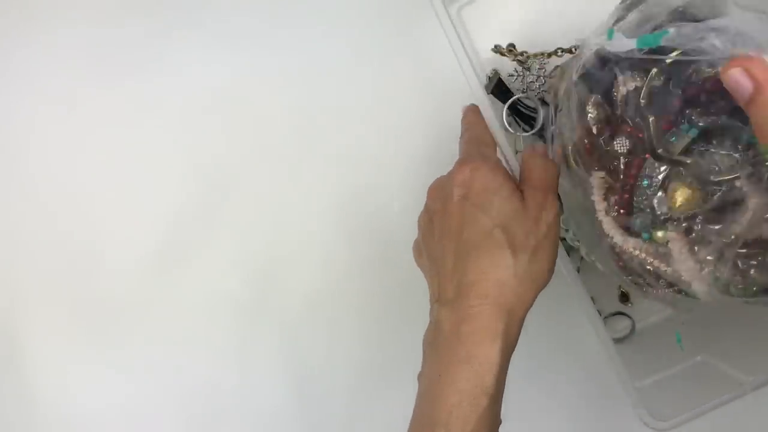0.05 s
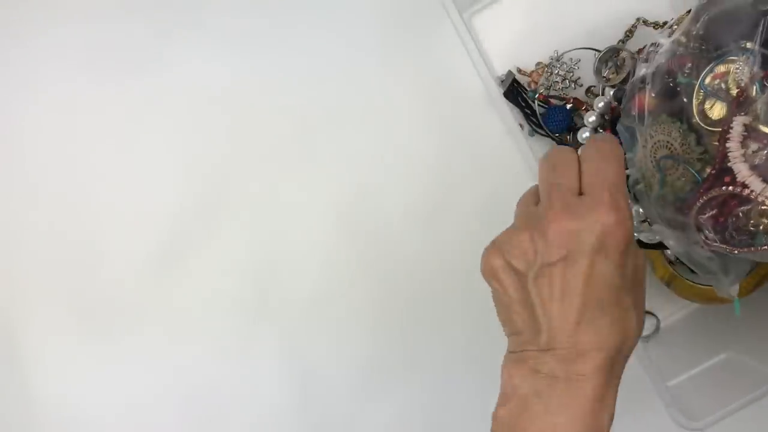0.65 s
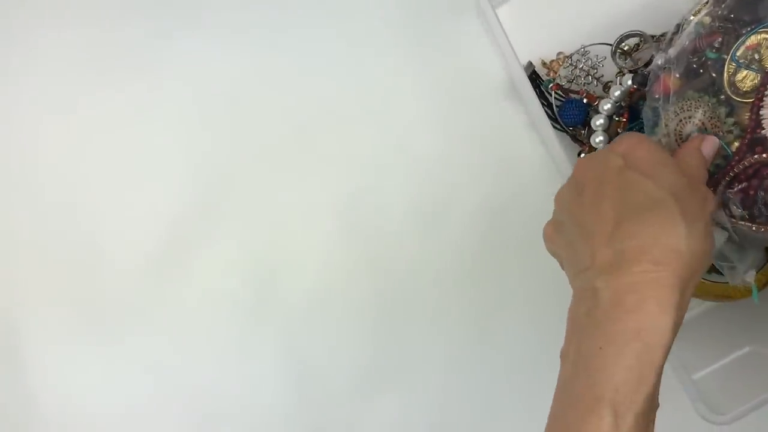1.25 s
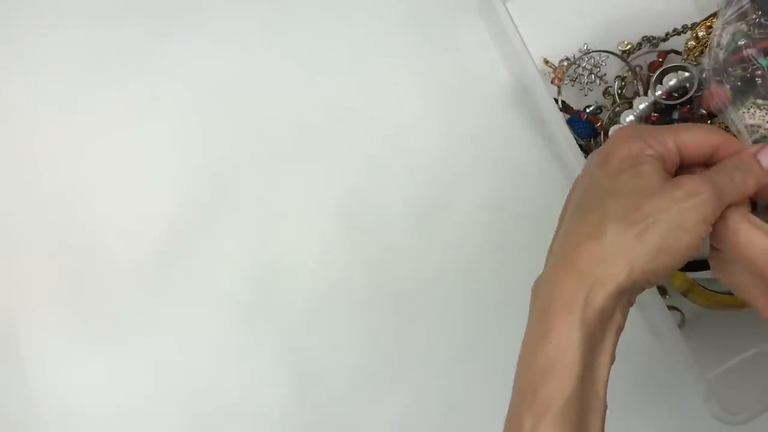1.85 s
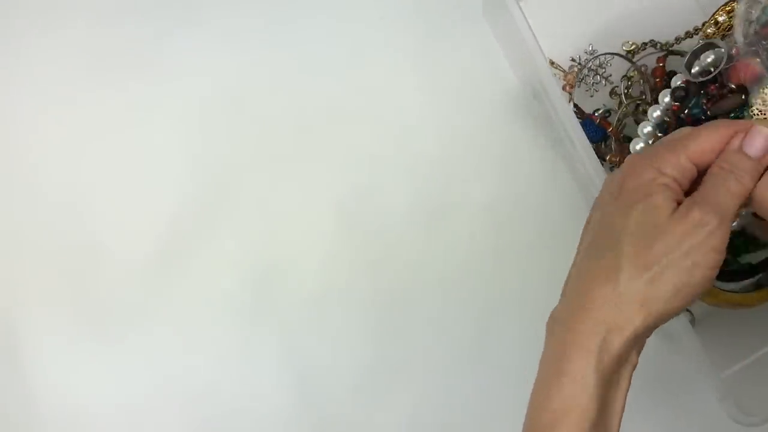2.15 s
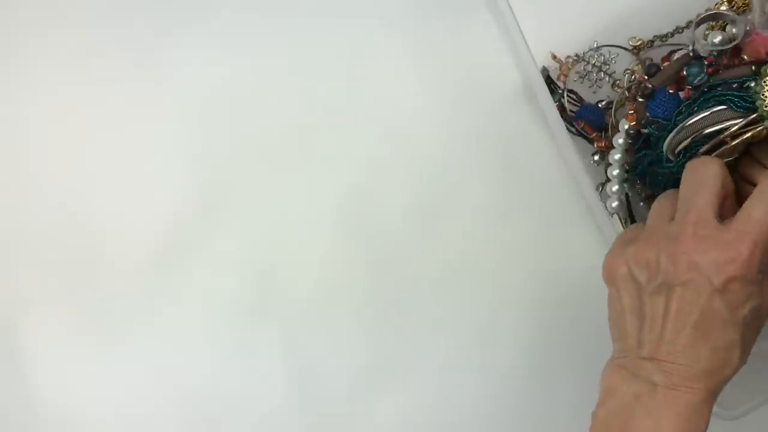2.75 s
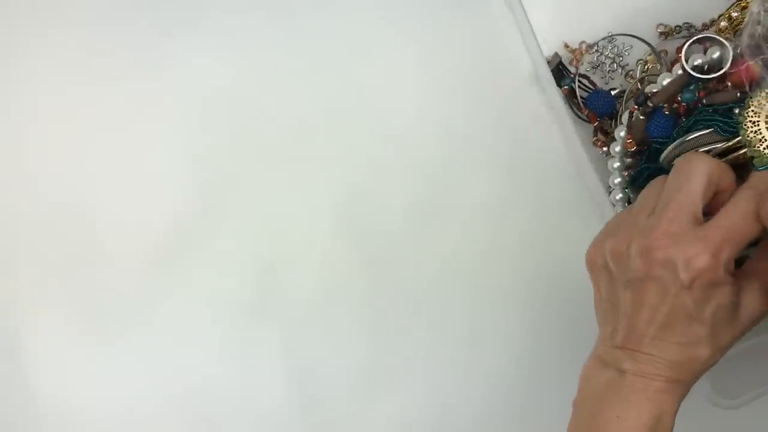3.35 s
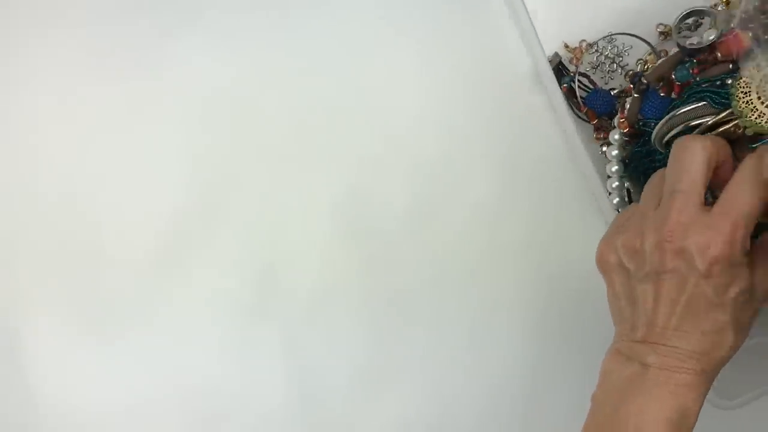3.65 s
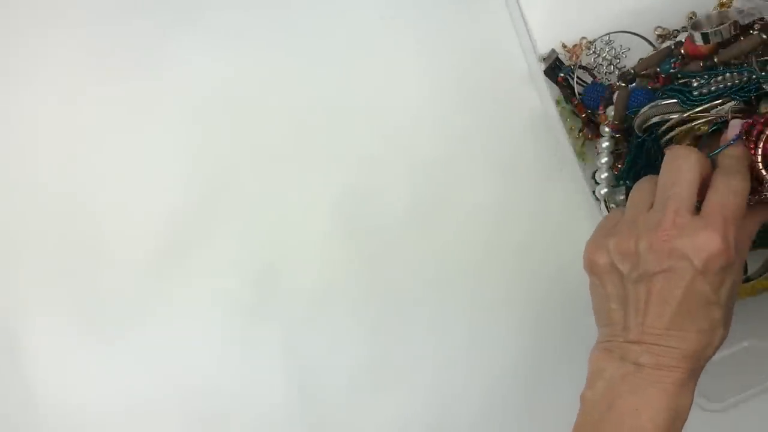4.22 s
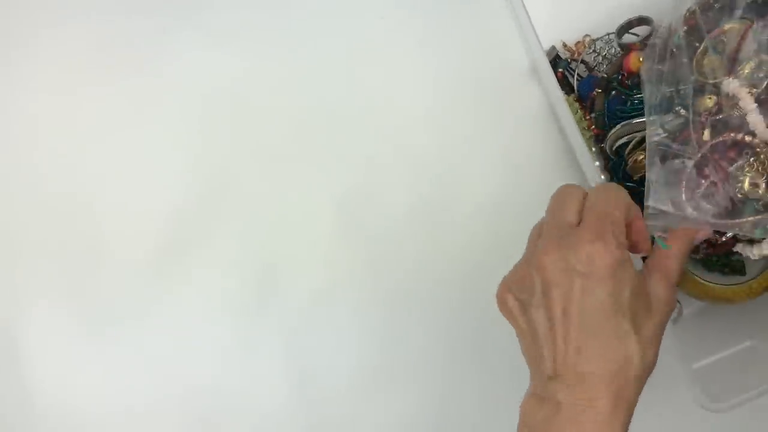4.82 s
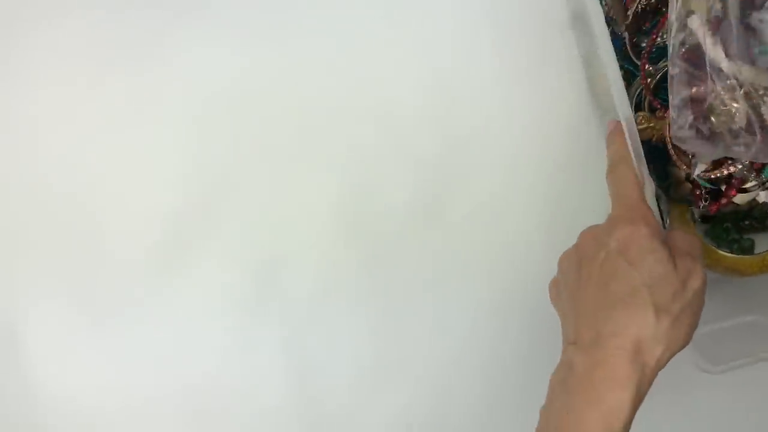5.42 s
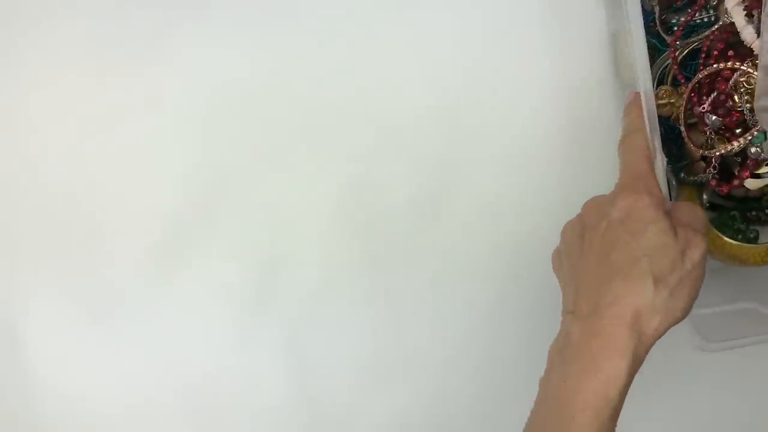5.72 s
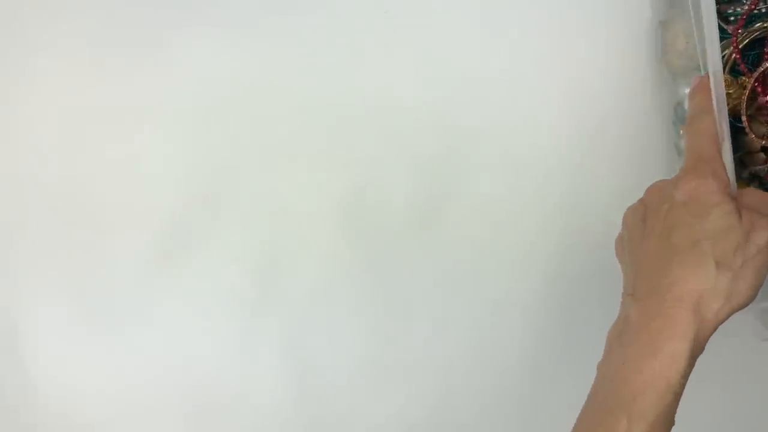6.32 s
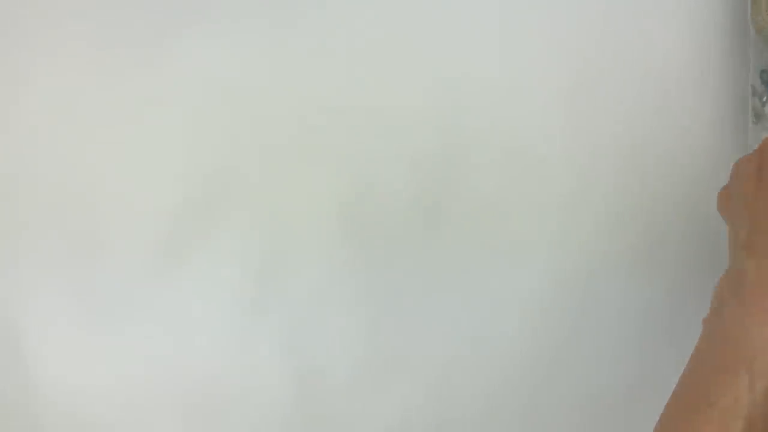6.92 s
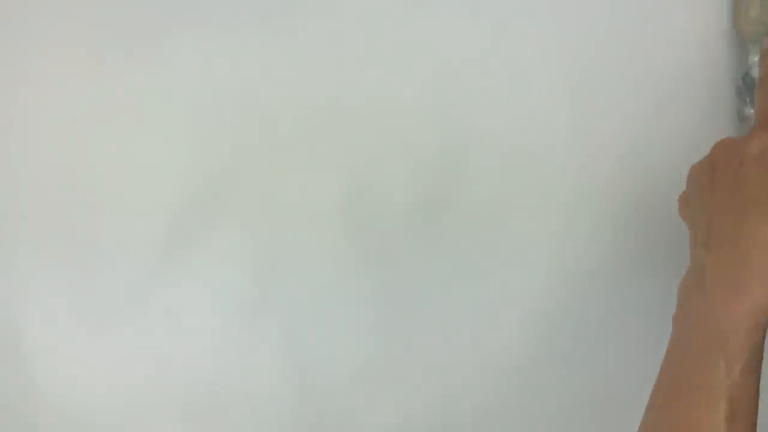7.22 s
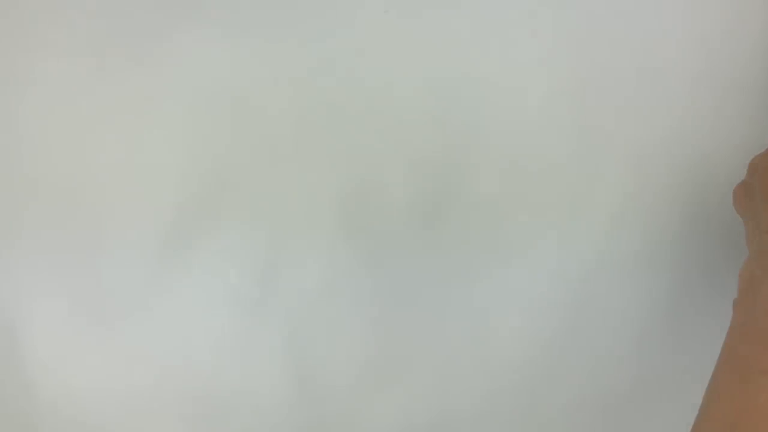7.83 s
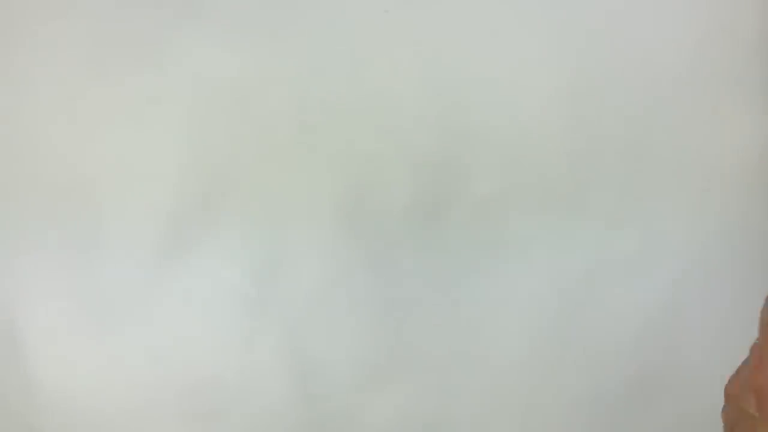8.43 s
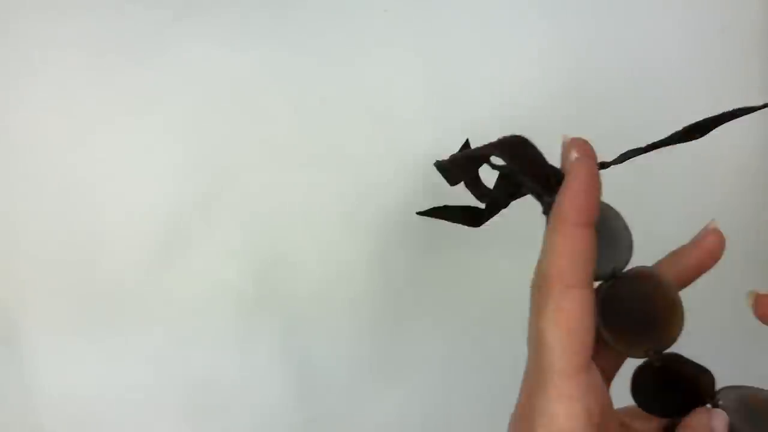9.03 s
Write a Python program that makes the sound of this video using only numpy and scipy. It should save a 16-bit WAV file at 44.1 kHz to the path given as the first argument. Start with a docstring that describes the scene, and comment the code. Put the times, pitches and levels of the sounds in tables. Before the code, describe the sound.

Beads and metal trinkets spill rattling into a plastic box in several bursts, followed by crinkling plastic in a small room.

```python
"""Costume jewellery is shaken from a plastic bag into a plastic box, close by in a small room.
Beads and metal trinkets clack, chatter and slide over the heap: short modes plus contact noise.
The box knocks and the table thumps under them; a pendant rings on after the last big pour.
Then the empty bag is crumpled, its film buckling in tiny steps and its creases snapping."""
import sys
import numpy as np
from scipy import signal
from scipy.fft import rfft, irfft, next_fast_len
from scipy.io import wavfile
from scipy.ndimage import uniform_filter1d

SR = 44100
rng = np.random.default_rng(int(sys.argv[2]) if len(sys.argv) > 2 else 0)


def dump_mix(stems):
    """Bounce the given channels to the path in sys.argv[1] as a 16-bit WAV at rate SR."""
    frames = np.atleast_2d(stems).T  # one column per channel
    limited = np.clip(frames, -1, 1)  # hard clip at full scale
    pcm = np.round(limited * 32767).astype(np.int16)
    wavfile.write(sys.argv[1], SR, pcm)


N = 404573
TIME_S = np.arange(N) / SR
AGE_S = np.arange(int(0.16 * SR)) / SR  # time since a blow
BRIEF_S = AGE_S[:len(AGE_S) // 2]
TOP_HZ = 15900
FITTING_HZ, FITTING_SPREAD_HZ = 8090, 770  # metal fittings, all of similar size
STIR_END_S = 6.45  # the heap starts coming to rest

# Box modes. Each row: frequency in Hz, relative level in dB, t60 in seconds.
BOX_MODES = [(270, -5, 0.032), (329.6, -6.5, 0.061), (410.3, -2, 0.11), (467.3, -3, 0.09), (470, -5, 0.062),
             (594.5, 1, 0.068), (700, 4, 0.019), (726, -0.5, 0.071), (885, 10, 0.017), (917, -0.5, 0.029),
             (926, 0.5, 0.023), (1088, -0.5, 0.053), (1155, -0.5, 0.021), (1320, -4, 0.024)]
# Tabletop modes. Each row: frequency in Hz, relative level in dB, t60 in seconds.
TABLE_MODES = [(38, -1, 0.22), (62, -10, 0.036), (99, -3, 0.12), (133.3, -2, 0.089), (149, 3, 0.098),
               (159.6, 0.5, 0.099), (193, -4, 0.11), (240, -4, 0.12), (259, -6, 0.022), (317, -9.5, 0.1)]


def amp(db):
    """Decibels to gain."""
    return 10 ** (np.asarray(db) / 20)


def power_sum_db(gains):
    """Level of several movements at once."""
    return 10 * np.log10(sum(g ** 2 for g in gains) + 1e-12)


def unit(x, attack_s=0.012):
    """Scale a blow to rms 1 over its attack."""
    return x / np.sqrt(np.mean(x[:int(attack_s * SR)] ** 2) + 1e-18)


def add(track, start_s, x):
    """Mix x into the track."""
    i = int(np.clip(start_s * SR, 0, N - 1))
    track[i:i + len(x)] += x[:N - i]


def colour(spectrum, hz):
    """Gain of a spectrum at hz. Each row: frequency in Hz, level in dB."""
    points_hz, db = np.transpose(spectrum)
    return amp(np.interp(np.log(hz + 1), np.log(points_hz), db))


def noise(spectrum, samples):
    """Coloured noise of rms 1."""
    n = next_fast_len(samples)
    hz = np.arange(n // 2 + 1) * SR / n
    x = irfft(rfft(rng.standard_normal(n)) * colour(spectrum, hz), n)[:samples]
    return x / x.std()


def fade(age_s, t60_s):
    """Free decay; gain 1 before age 0."""
    return np.exp(-np.log(1000) * np.maximum(age_s, 0) / np.maximum(t60_s, 1e-3))


def push(start_s, length_s, attack_s, sag_db, release_t60_s):
    """Gain of one movement: swells up to its start, sags, dies away."""
    age_s = TIME_S - start_s
    rise = np.clip(1 + age_s / attack_s, 0, 1)
    spent = np.clip(age_s / length_s, 0, 1)
    return rise * amp(-sag_db * spent) * fade(age_s - length_s, release_t60_s)


def ring(modes, age_s, spread_db, detune=0):
    """Struck modes: the contact point weights each anew, a shifting load detunes it."""
    hz, db, t60_s = np.transpose(modes)[:, :, None]
    gain = amp(db + spread_db * rng.standard_normal(hz.shape)) * rng.choice([-1, 1], hz.shape)
    hz = hz * (1 + detune * rng.standard_normal(hz.shape))
    return unit((gain * np.sin(2 * np.pi * hz * age_s) * fade(age_s, t60_s)).sum(0))


def crack(spectrum, t60_s, scatter_db=-18, scatter_t60_s=0.15):
    """Noise burst of a contact or snap, with a weaker tail of scatter."""
    envelope = fade(BRIEF_S, t60_s) + amp(scatter_db) * fade(BRIEF_S, scatter_t60_s)
    return unit(noise(spectrum, len(BRIEF_S)) * envelope)


def shower(sounds, db, per_s, spread_db):
    """Random contacts: per_s a second at -40 dB, denser as the motion grows."""
    rate_per_s = per_s * amp(0.35 * (db + 40))
    hits = np.flatnonzero(rng.random(N) < rate_per_s / SR)
    sizes = amp(spread_db * np.minimum(rng.exponential(size=len(hits)), 3))
    sizes /= np.sqrt(uniform_filter1d(sizes ** 2, size=15))
    gains = sizes * amp(db[hits]) * np.sqrt(SR / rate_per_s[hits])  # rms follows db
    sounds = [x / np.linalg.norm(x) for x in sounds]
    out = np.zeros(N)
    for i, gain, pick in zip(hits, gains, rng.integers(len(sounds), size=len(hits))):
        add(out, i / SR, gain * sounds[pick])
    return out


def trinket(spectrum, hz, t60_s, others_db, crack_db, crack_t60_s, count=6):
    """Small piece: a leading mode, weaker ones around it, and the contact crack."""
    others_hz = np.minimum(hz * 2 ** rng.uniform(-0.7, 0.75, count), TOP_HZ)
    levels_db = others_db + 20 * np.log10(colour(spectrum, others_hz))
    others = np.c_[others_hz, levels_db, t60_s * rng.uniform(0.5, 1.4, count)]
    tone = ring(np.vstack([(hz, 0, t60_s), others]), BRIEF_S, spread_db=-1)
    return unit(tone + amp(crack_db) * crack(spectrum, crack_t60_s))


def bead(hz):
    """Glass, wood or resin: a dry clack."""
    # Contact spectrum. Each row: frequency in Hz, level in dB.
    spectrum = [(200, -35), (700, -18.5), (1300, -1), (2000, -3.5), (3000, -4), (4500, -10.5), (6500, -13),
                (12000, -41)]
    return trinket(spectrum, hz, t60_s=0.019, others_db=-8.5, crack_db=1.5, crack_t60_s=0.042)


def metal(hz):
    """Link, ring or clasp damped by the heap: a bright tick."""
    # Contact spectrum. Each row: frequency in Hz, level in dB.
    spectrum = [(1500, -36), (4000, -10.5), (5800, -9.5), (7700, 1), (9500, -3.5), (11500, -11),
                (13500, -22.5), (16000, -30)]
    return trinket(spectrum, hz, t60_s=0.024, others_db=-2, crack_db=7, crack_t60_s=0.014)


def flow_db(stir_db=-61):
    """Motion of beads and of chains: short spills and the big pour over a slight stir."""
    # One slide per shake. Each row: start and length in seconds, bead and chain levels in dB.
    spills = [(0.0, 0.071, -34, -33), (0.089, 0.072, -24, -26.5), (.245, 0.095, -28, -29),
              (0.379, 0.051, -38, -39.5), (0.488, 0.15, -34, -35), (0.647, 0.11, -42, -44),
              (0.797, 0.07, -33, -38), (1.132, 0.084, -52, -48.5), (1.317, 0.062, -46, -46),
              (1.443, .11, -43, -43.5), (1.627, 0.13, -44, -45), (1.919, 0.092, -44, -44),
              (2.082, 0.093, -45, -47), (2.219, 0.075, -28, -27.5), (2.447, 0.1, -30, -34),
              (2.631, 0.28, -49, -50), (2.981, 0.042, -49, -50), (3.038, .18, -40.5, -42),
              (3.499, 0.19, -55, -56.5), (3.755, 0.047, -29, -30.5), (3.93, 0.064, -41, -43.5),
              (4.039, 0.21, -46.5, -44), (4.283, .05, -37.5, -34.5), (4.383, 0.089, -43, -43.5),
              (4.486, 0.038, -39, -36.5), (4.571, 0.21, -50, -48), (5.85, 0.22, -57.5, -50.5),
              (6.309, 0.059, -49.5, -62)]
    # The bag is upended. Each row: time in seconds, flow in dB.
    pour_curve = [(4.85, -60.5), (4.89, -41.5), (5.08, -38), (5.22, -24.5), (5.33, -21), (5.54, -46.5),
                  (5.59, -42.5), (5.8, -57.5)]
    pour = amp(np.interp(TIME_S, *np.transpose(pour_curve), left=-np.inf, right=-np.inf))
    stir = amp(stir_db) * fade(TIME_S - STIR_END_S, t60_s=0.66)
    beads, chains = [pour, stir], [pour, stir]
    for start_s, length_s, bead_db, chain_db in spills:
        slide = push(start_s, length_s, attack_s=0.018, sag_db=5, release_t60_s=0.22)
        beads.append(slide * amp(bead_db))
        chains.append(slide * amp(chain_db))
    return power_sum_db(beads), power_sum_db(chains)


def sliding_heap(count=60):
    """Beads and chains run over each other and drum lightly on box and table."""
    rattle_db, jingle_db = flow_db()
    clacks = [bead(hz) for hz in np.geomspace(1250, 4200, count)]
    out = shower(clacks, rattle_db - 2, per_s=400, spread_db=1.5)
    ticks = [metal(hz) for hz in rng.normal(8200, 1200, count)]
    out += shower(ticks, jingle_db - 2, per_s=340, spread_db=3)
    box_taps = [ring(BOX_MODES, AGE_S, spread_db=5.5, detune=0.052) for _ in range(count)]
    out += shower(box_taps, rattle_db - 7.5, per_s=350, spread_db=4)
    table_taps = [ring(TABLE_MODES, AGE_S, spread_db=-1.5) for _ in range(count)]
    return out + shower(table_taps, rattle_db - 19, per_s=270, spread_db=6.5)


def strays(db=-57, count=30):
    """Single loose beads and links slip and tick."""
    pieces = [bead(hz) for hz in np.geomspace(1300, 5000, count)]
    pieces += [metal(hz) for hz in rng.normal(FITTING_HZ, FITTING_SPREAD_HZ, count)]
    settling = fade(TIME_S - STIR_END_S, t60_s=0.5)
    return shower(pieces, np.full(N, db), per_s=45, spread_db=1.5) * settling


def background(room_db=-49, rumble_db=-40):
    """Faint room noise over a very deep rumble."""
    # Spectra. Each row: frequency in Hz, level in dB.
    room_spectrum = [(20, 0.5), (35, -2.5), (120, -16.5), (400, -23), (800, -28), (1400, -37.5),
                     (4700, -42.5), (7100, -33.5), (15000, -60)]
    rumble_spectrum = [(2, 9), (6, 7), (12, -10), (25, -3), (50, -43), (100, -20), (400, -86),
                       (2000, -120)]
    rumble = amp(rumble_db) * noise(rumble_spectrum, N)
    return amp(room_db) * noise(room_spectrum, N) + rumble


def bumps(width_oct=0.34):
    """Padded blows reach only a few low modes of the box, and the table under it."""
    # Bumps on the box wall. Each row: start in seconds, level in dB, centre pitch in Hz.
    knocks = [(.012, -29, 413), (0.061, -25, 394), (.33, -41, 610), (1.105, -31.5, 510),
              (1.316, -37.5, 539.6), (1.362, -38, 483.4), (1.428, -34.5, 418.8), (1.703, -40.5, 470),
              (1.975, -42.5, 570), (2.146, -31, 570), (2.433, -44, 480.2), (2.82, -42.5, 468),
              (3.018, -35.5, 476), (3.698, -42, 417.5), (3.745, -22, 334.7), (4.587, -34.5, 749.5),
              (4.875, -34, 413.5), (5.35, -32, 606.6), (6.696, -37.5, 744), (7.566, -31.5, 390),
              (7.625, -39, 400), (8.36, -55, 485), (8.68, -48.5, 555), (9.089, -52.5, 335)]
    # Weight settling on the table. Each row: start in seconds, relative level in dB.
    thumps = [(.078, -36), (0.344, -34), (.47, -39), (0.782, -31), (.83, -41), (1.103, -39), (2.929, -48.5),
              (3.745, -36), (4.261, -41), (4.304, -36), (4.491, -37), (4.774, -34.5), (5.249, -33),
              (5.355, -35), (7.569, -30.5), (7.607, -35), (7.669, -38), (8.534, -57)]
    out = np.zeros(N)
    for start_s, db, centre_hz in knocks:
        reached = [(hz, -4 * (np.log2(hz / centre_hz) / width_oct) ** 2, t60_s)
                   for hz, _, t60_s in BOX_MODES]
        add(out, start_s, amp(db) * ring(reached, AGE_S, spread_db=-4.5))
    soft_onset = 1 - fade(AGE_S, t60_s=0.038)
    for start_s, db in thumps:
        add(out, start_s, amp(db - 1) * unit(ring(TABLE_MODES, AGE_S, spread_db=3) * soft_onset))
    return out


def chatter(strike, within_s, bounces):
    """A loose piece touches again in quick succession, each time on another spot."""
    out = strike()
    lags_s = rng.uniform(0.1, 1, bounces) * within_s
    for lag_s, gain in zip(lags_s, rng.uniform(0.35, 1, bounces)):
        i = max(int(lag_s * SR), 1)
        out[i:] += gain * strike()[:-i]
    return unit(out)


def landings():
    """Each landing sounds box wall, bead and metal fittings; heavy pieces tumble longer."""
    # Each row: start in seconds, relative levels of fittings, wall and bead in dB, bead pitch in Hz.
    clacks = [(0.0134, -19, -25.5, -25.5, 1570), (0.0618, -21, -26.5, -22.5, 1560),
              (0.0749, -13.5, -25, -21.5, 1800), (0.0944, -20, -30.5, -24, 2870),
              (0.1081, -11, -22.5, -22, 2580), (0.1209, -15, -17.5, -17, 1490),
              (0.1526, -6.5, -23, -16.5, 2960), (0.2407, -13, -30.5, -18.5, 2830),
              (0.2618, -18, -28, -25, 1410), (0.3315, -18.5, -22, -20.5, 1280),
              (0.383, -20, -35.5, -30.5, 1320), (0.4082, -20, -42.5, -31.5, 1350),
              (0.5986, -20, -32, -30, 1820), (0.6554, -29, -43.5, -39, 2830),
              (0.6935, -34, -36.5, -33.5, 1780), (0.7929, -28, -31.5, -27.5, 1200),
              (0.813, -18.5, -31, -24, 1190), (0.9213, -34, -44, -37, 1790), (1.1054, -32, -32, -31, 1457),
              (1.1964, -27, -50, -45, 2450), (1.3172, -28, -35, -35, 2810), (1.3728, -23, -42, -57, 1540),
              (1.4299, -25, -35, -40, 1514), (1.4574, -20.5, -37, -26, 2360),
              (1.4918, -25, -40.5, -39, 1895), (1.5284, -20, -38, -29.5, 1638),
              (1.6226, -24.5, -38.5, -35.5, 3010), (1.6427, -28, -36.5, -31, 1670),
              (1.701, -26, -39, -42, 2680), (1.8747, -22.5, -48.5, -38, 1548),
              (1.9178, -35.5, -42, -37, 1985), (1.9734, -40, -39, -35.5, 1799),
              (2.1174, -29, -34.5, -32.5, 2760), (2.2022, -7.5, -36, -35, 3438),
              (2.2458, -12, -32.5, -25, 1760), (2.3052, -18.5, -29, -19.5, 1411),
              (2.3405, -28, -34, -32.5, 2906), (2.4491, -13, -29, -21, 1754),
              (2.4809, -20, -30.5, -23.5, 1300), (2.5702, -20.5, -40, -26.5, 1890),
              (2.7401, -32, -46, -34.5, 1283), (2.7726, -34, -46, -34.5, 2830),
              (2.8213, -46, -36, -35, 1850), (3.028, -19.5, -36, -25.5, 5080),
              (3.0651, -20.5, -42.5, -38, 5220), (3.2268, -50, -39, -42, 1299),
              (3.3293, -27, -58, -48.5, 4850), (3.4101, -33.5, -49, -46, 1367),
              (3.696, -18.5, -45, -39, 3444), (3.7259, -29, -29, -31, 1300),
              (3.7448, -30, -25.5, -20, 2510), (3.7517, -16, -22.5, -26, 1847),
              (3.7924, -22, -34.5, -26.5, 1393), (3.9379, -18, -34.5, -26.5, 1499),
              (3.9638, -13, -40, -35, 2470), (4.1048, -20, -50, -47, 5220),
              (4.1652, -22, -47.5, -29.5, 1870), (4.248, -26, -34.5, -27.5, 1913),
              (4.2795, -19, -32.5, -23.5, 1495), (4.2971, -22, -42.5, -31, 2555),
              (4.337, -23, -38, -48, 2557), (4.3727, -40, -37, -37, 1520),
              (4.4846, -9.5, -35.5, -30.5, 1602), (4.5124, -18, -40.5, -40, 4466),
              (4.6226, -17, -48, -44, 1318), (4.7202, -25, -55, -46, 5156), (4.8701, -22, -36, -35, 1930),
              (4.9088, -25, -35, -25, 3900), (4.9345, -17.5, -37.5, -39, 1851),
              (5.001, -16.5, -37.5, -33, 1835), (5.0454, -19, -28, -27, 1544),
              (5.0978, -15.5, -28, -33, 1312), (5.1605, -20, -24, -25, 1643),
              (5.2256, -12, -21.5, -16, 1302), (5.2769, -5, -16.5, -16.5, 2060),
              (5.291, -11, -19, -13.5, 1191), (5.3155, -16, -17, -10.5, 1323),
              (5.3423, -9, -15.5, -11.5, 1340), (5.3824, -24, -29, -20.5, 3310),
              (5.4416, -31, -35.5, -20.5, 1310), (5.566, -44, -34.5, -31.5, 1300),
              (5.5943, -23.5, -36.5, -29, 2643), (5.757, -21.5, -52.5, -39.5, 1900),
              (5.851, -22, -51, -40, 2780), (5.8644, -13.5, -46.5, -43, 2750),
              (5.9211, -20, -63, -53, 5110), (6.0128, -22, -50.5, -39.5, 5200),
              (6.0778, -32.5, -54.5, -57, 1603), (6.1648, -30.5, -47, -40, 1200),
              (6.2336, -25, -55.5, -46, 1295), (6.3023, -32.5, -47.5, -40, 1820),
              (6.336, -39.5, -48, -39, 1510), (6.3633, -28.5, -52.5, -38, 2220)]
    out = np.zeros(N)
    fittings_hz = rng.normal(FITTING_HZ, FITTING_SPREAD_HZ, len(clacks))
    for (start_s, metal_db, wall_db, bead_db, bead_hz), metal_hz in zip(clacks, fittings_hz):
        tumble_s = 0.008 * amp(0.32 * (wall_db + 21))
        wall = chatter(lambda: ring(BOX_MODES, BRIEF_S, spread_db=4, detune=0.027), tumble_s, bounces=2)
        clack = chatter(lambda: bead(bead_hz), tumble_s, bounces=3)
        tick = chatter(lambda: metal(metal_hz), within_s=0.003, bounces=2)
        add(out, start_s, amp(wall_db - 5) * wall + amp(bead_db - 4) * clack + amp(metal_db - 14) * tick)
    return out


def pings():
    """Single pieces ring briefly and the film squeaks: one decaying sine each."""
    # Each row: start in seconds, pitch in Hz, level in dB, t60 in seconds.
    notes = [(0.2626, 11250, -27.5, 0.051), (2.2015, 6486, -24.5, 0.034), (2.2025, 3426, -25.5, 0.058),
             (2.209, 1890, -32.5, 0.096), (3.066, 5250, -36, .04), (5.758, 1900, -50, 0.13),
             (6.014, 5250, -40, 0.046), (6.014, 2760, -46, 0.067), (6.014, 3950, -49, 0.073),
             (7.647, 3130, -36, 0.17), (7.744, 1453, -32, 0.074)]
    out = np.zeros(N)
    for start_s, hz, db, t60_s in notes:
        add(out, start_s, amp(db) * ring([(hz, 0, t60_s)], AGE_S, spread_db=0))
    return out


def pendant():
    """A free-hanging pendant is struck and rings on."""
    # Each row: start in seconds, level in dB.
    strikes = [(5.657, -28.5), (5.758, -39.5), (7.107, -51), (7.281, -46), (7.38, -55)]
    # Each row: frequency in Hz, relative level in dB, t60 in seconds.
    modes = [(5300, -23, 0.22), (6982, -2, 0.076), (7900, -1, 0.19), (8030, 7, 0.094), (8200, -8, 0.18),
             (9400, -12, 0.27), (10456, -9, 0.096), (10800, -11, 0.52), (12210, -11.5, 0.17),
             (13610, -18, 0.33), (14610, -15, 0.067)]
    out = np.zeros(N)
    for start_s, db in strikes:
        add(out, start_s, amp(db) * ring(modes, TIME_S[:SR // 2], spread_db=2))
    return out


def squeezing_db(creep_db=-67.5, creep_end_s=9.05):
    """Levels of rustle and fine crackle: the hand squeezes, the film creeps on."""
    # Each row: start and length in seconds, rustle and crackle levels in dB.
    squeezes = [(6.62, .22, -50, -52), (6.87, 0.051, -43, -43.5), (6.922, 0.072, -31, -36),
                (7.04, 0.23, -45, -45.5), (7.296, 0.28, -38.5, -40), (7.604, .1, -35, -42.5),
                (7.75, 0.029, -35, -55), (8.34, 0.13, -59, -61.5), (8.665, 0.029, -51.5, -60.5)]
    creep = amp(creep_db) * (TIME_S > squeezes[0][0]) * (TIME_S < creep_end_s)
    rustle, crackle = [creep], [creep]
    for start_s, length_s, rustle_db, crackle_db in squeezes:
        squeeze = push(start_s, length_s, attack_s=0.04, sag_db=3.5, release_t60_s=0.27)
        rustle.append(squeeze * amp(rustle_db))
        crackle.append(squeeze * amp(crackle_db))
    return power_sum_db(rustle), power_sum_db(crackle)


def folds(x, echo_gain=0.33):
    """Sound bounces inside the collapsing folds, so their hollow colour keeps shifting."""
    turns_s = np.linspace(0, TIME_S[-1], 90)
    lag_s = 0.000617 * np.interp(TIME_S, turns_s, rng.uniform(0.36, 2.3, len(turns_s)))
    echo = np.interp(TIME_S - lag_s, TIME_S, x)
    return (x + echo_gain * echo) / np.hypot(1, echo_gain)


def bag(glide_db=-41, count=40):
    """The film glides over the table and buckles in tiny steps; some creases snap."""
    # Spectra of buckling sheet, fine creases, gliding film and a snap's sharp edge.
    # Each row: frequency in Hz, level in dB.
    sheet = [(100, -27), (400, -5), (800, -5), (1400, -3), (2700, -6), (4200, -10), (6500, -12),
             (12000, -59)]
    crease = [(1500, -31), (4000, 0.5), (6000, -1), (7900, 9.5), (9500, -4), (11500, -7), (16000, -44.5)]
    film = [(300, -24.5), (800, -17), (1400, -4.5), (2600, -4.5), (4500, -7), (8300, -20.5), (12000, -34)]
    edge = [(1500, -30), (4000, -1.5), (6000, -3.5), (8300, 7), (11000, -7.5), (16000, -25)]
    # Each row: start in seconds, relative levels of edge and sheet in dB.
    snaps = [(6.5878, -25, -44), (6.6945, -31, -34), (6.917, -17, -31), (6.9443, -21, -26),
             (7.004, -44, -31.5), (7.0562, -25, -32.5), (7.105, -24, -48), (7.2812, -26, -30.5),
             (7.3006, -14.5, -32), (7.3806, -39, -32), (7.4532, -36, -31), (7.4993, -25, -31.5),
             (7.5729, -37, -30), (7.707, -31, -30), (7.7388, -28, -26.5), (7.7976, -19, -50),
             (7.865, -29, -44), (7.9027, -37, -47), (7.9513, -18.5, -43.5), (8.0034, -30, -42),
             (8.1077, -20, -46), (8.1418, -33, -45), (8.2048, -39, -61), (8.2419, -20, -45.5),
             (8.4264, -28.5, -68), (8.6515, -36, -39.5), (8.9223, -30.5, -42)]
    rustle_db, crackle_db = squeezing_db()
    buckles = [crack(sheet, t60_s=0.013) for _ in range(count)]
    out = folds(shower(buckles, rustle_db, per_s=1300, spread_db=9))
    crackles = [crack(crease, t60_s=0.013) for _ in range(count)]
    out += shower(crackles, crackle_db - 2, per_s=600, spread_db=4)
    glide = push(start_s=6.6, length_s=0.29, attack_s=0.083, sag_db=2, release_t60_s=0.74)
    out += amp(glide_db) * glide * noise(film, N)
    for start_s, edge_db, sheet_db in snaps:
        add(out, start_s, amp(sheet_db - 4) * crack(sheet, t60_s=0.024))
        add(out, start_s, amp(edge_db - 17) * crack(edge, t60_s=0.027))
    return out


def room(x, t60_s=0.32, tail_db=-12, gap_s=0.006):
    """Direct sound plus the short tail of a small room."""
    age_s = TIME_S[:SR // 2]
    spectrum = [(100, 0.5), (600, 2), (2500, -5), (7500, -7.5), (15000, -3)]
    tail = noise(spectrum, len(age_s)) * fade(age_s, t60_s) * (age_s > gap_s)
    return x + signal.fftconvolve(x, amp(tail_db) * tail / np.linalg.norm(tail))[:N]


def scene():
    """Jewellery, box and bag in the room; mono."""
    direct = landings() + sliding_heap() + strays() + bumps() + pendant() + pings() + bag()
    return (room(direct) + background())[None]


def record(dry):
    """Round the loudest peaks and cut the top."""
    ceiling = 0.52
    rounded = dry / (1 + (dry / ceiling) ** 4) ** 0.25
    return signal.sosfilt(signal.ellip(8, 0.2, 70, TOP_HZ, fs=SR, output="sos"), rounded)


dry = scene()
out = record(dry)
dump_mix(out)
```